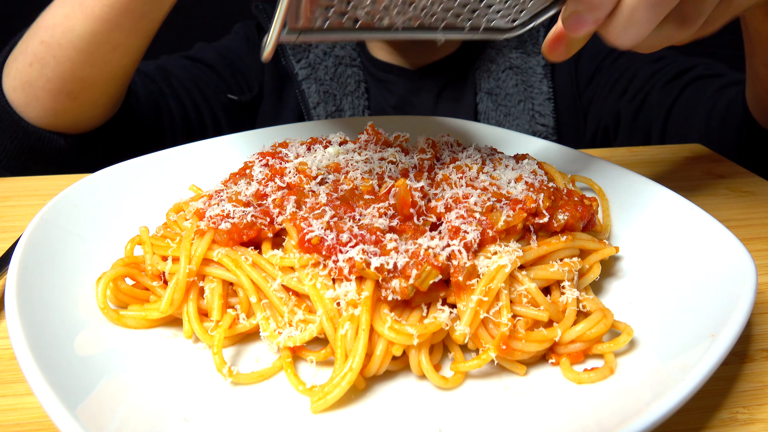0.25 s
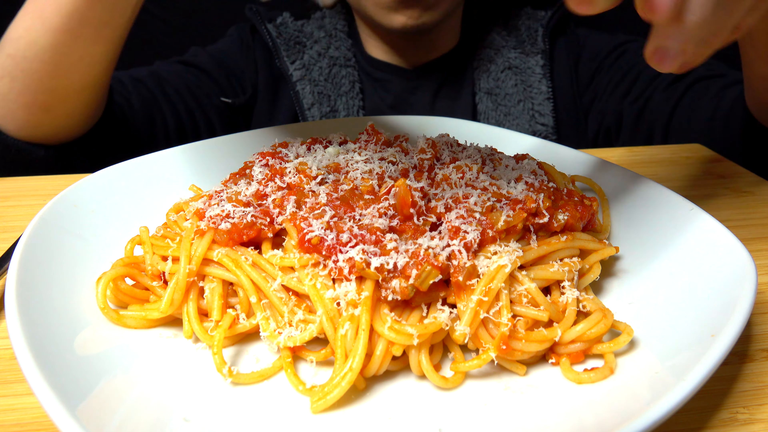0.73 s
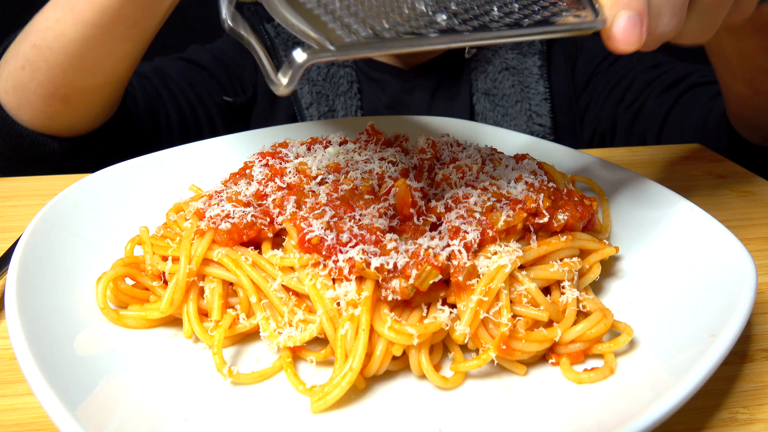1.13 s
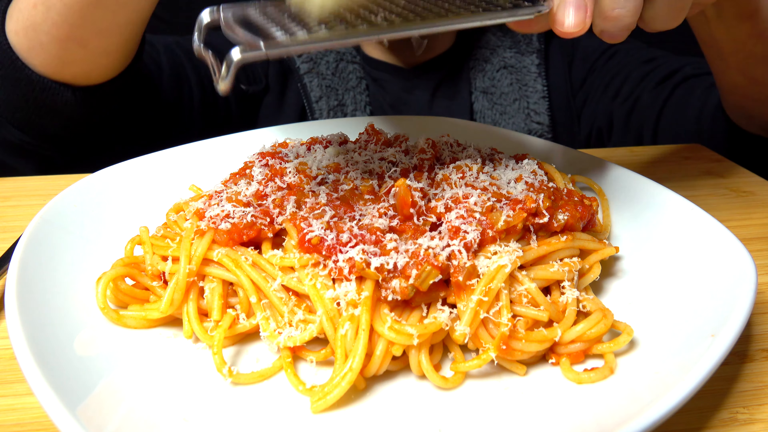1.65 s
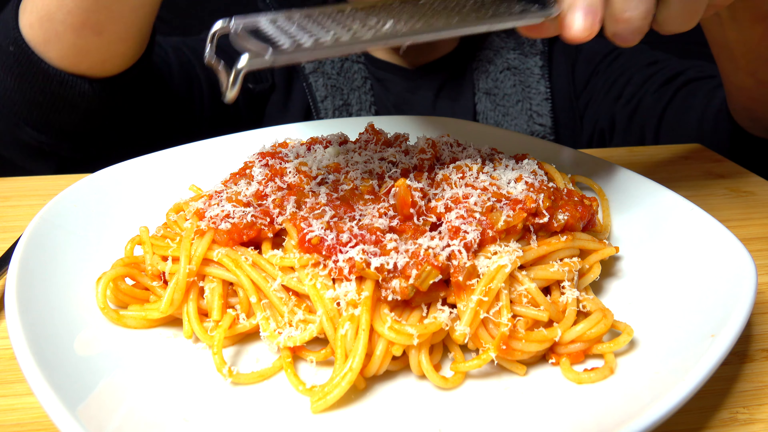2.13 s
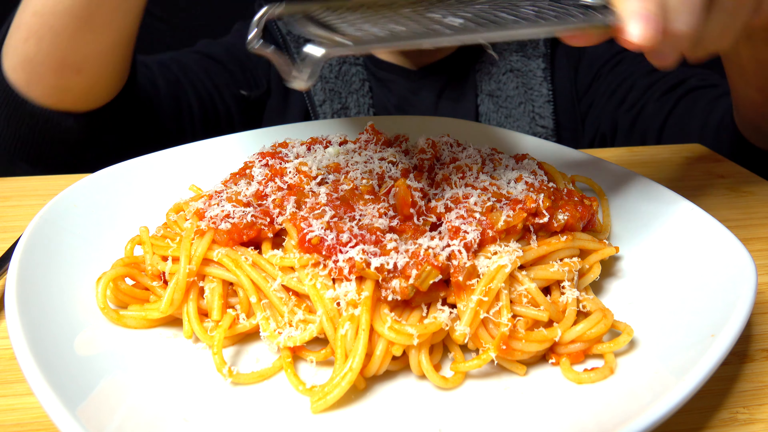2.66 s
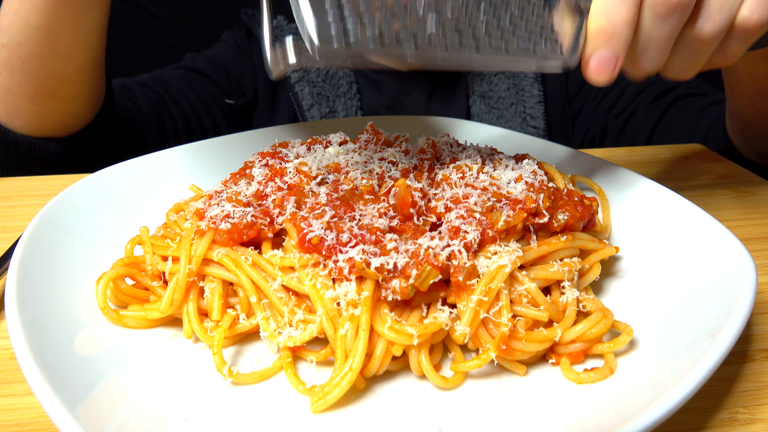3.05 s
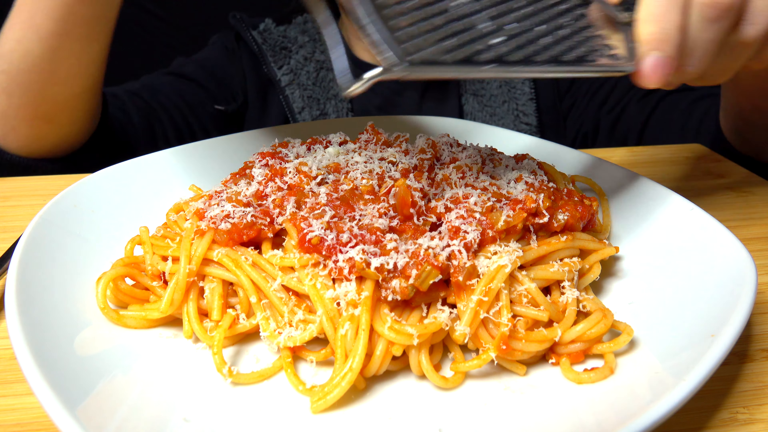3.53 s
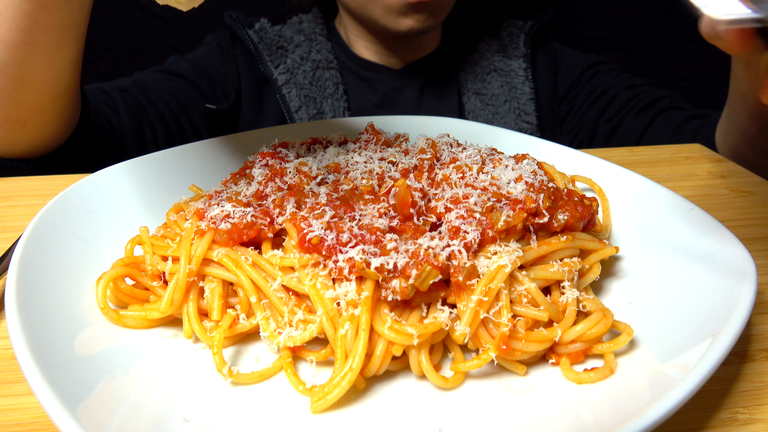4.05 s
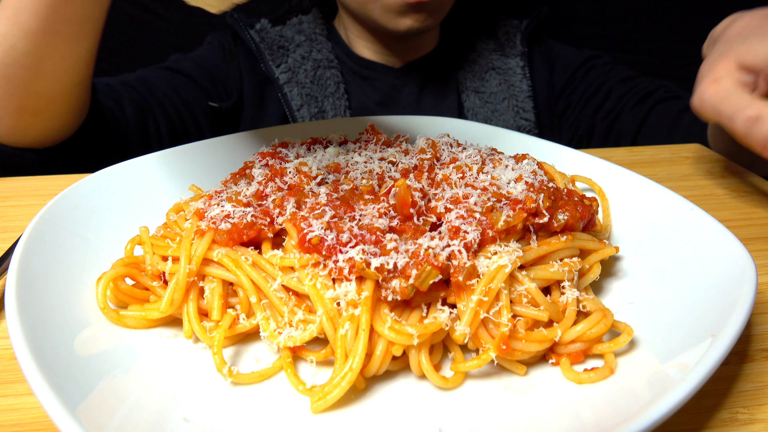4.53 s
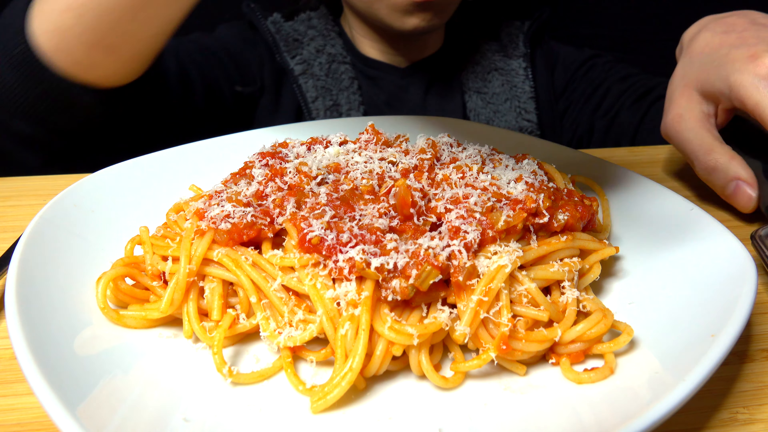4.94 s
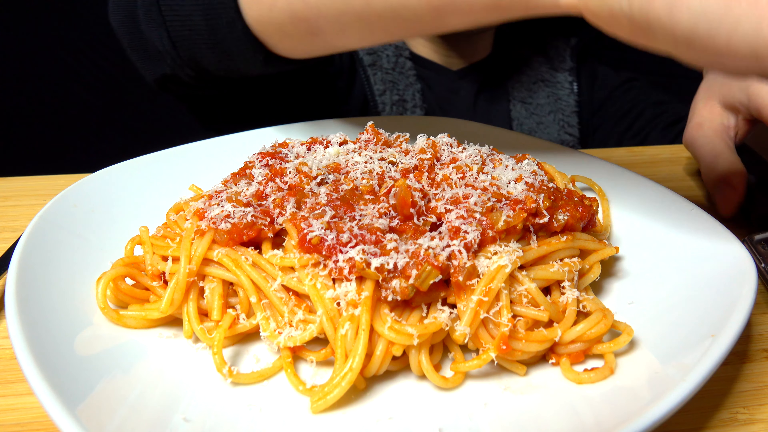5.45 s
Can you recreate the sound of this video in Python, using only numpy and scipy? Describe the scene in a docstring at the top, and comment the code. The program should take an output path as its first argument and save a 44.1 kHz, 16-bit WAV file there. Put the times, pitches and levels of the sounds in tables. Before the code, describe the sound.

Faint dry rasping and small metallic clicks in a rumbling room, sleeves rustling, then the grater cracks down and a second knock rattles tableware.

```python
"""Hard cheese is rubbed softly over a hand-held steel grater: crumb clicks blurred by the room into a rasp.
Light taps among the strokes and after them click and ring the grater; sleeves rustle as the arms move.
Then the grater is put down on the wooden table: cracks, ringing metal and a boomy echo.
Last, a second knock jolts the table and rings the tableware. Both knocks overload the close stereo pickup.
Under it all lie room rumble, hiss and a thin electrical whine, made from shaped noise and a wavering tone."""
import sys
import numpy as np
from scipy import signal
from scipy.fft import rfft, irfft
from scipy.io import wavfile
from scipy.ndimage import uniform_filter1d

SR = 44100
rng = np.random.default_rng(int(sys.argv[2]) if len(sys.argv) > 2 else 0)


def int16_out(signal):
    """Quantize to a 16-bit WAV file."""
    q = np.round(np.clip(np.atleast_2d(signal).T, -1, 1) * 32767)
    wavfile.write(sys.argv[1], SR, q.astype(np.int16))


N = 250929  # length in samples

# Background noise spectrum: pitch_hz, relative level_db (per Hz)
FLOOR_COLOUR = [(15, -28), (28, -20), (60, -10), (110, -4.5), (150, -2), (340, -17.5), (600, -21.5),
                (1000, -19.5), (1300, -22), (2070, -27.5), (6000, -33.5), (15600, -34.5)]
# Likeness of the background noise at left and right: pitch_hz, likeness (-1 to 1)
FLOOR_LIKENESS = [(60, 0.92), (130, 1), (290, 0.53), (640, 0.16), (1400, -0.16), (3100, 0.36), (7000, 0.26),
                  (15000, 0.55)]
FLOOR_DB = -45
WHINE_HZ, WHINE_DB = 13950, -72.5

# How long room echoes last: pitch_hz, fall_by_60_db_s
ROOM_T60 = [(100, 0.9), (260, 0.26), (700, 0.48), (1840, 0.59), (4850, 0.57), (8000, 0.5), (14000, 0.35)]
# Likeness of nearby noise and echoes at left and right: pitch_hz, likeness (-1 to 1)
ROOM_LIKENESS = [(60, 0.97), (130, 1), (290, 0.83), (640, 0.67), (1410, 0.58), (3100, 0.46), (6800, 0.43),
                 (15000, 0.5)]
# Extra level at the left microphone: pitch_hz, left_minus_right_db
LEFT_LEAN = [(200, 1), (700, .5), (2400, 2), (8000, 3)]
# Low notes of the room: pitch_hz, relative level_db, fall_by_60_db_s
ROOM_MODES = [(74.2, -12, 0.21), (122.7, -12.5, 1), (187.9, -0.5, 0.69), (245, -13.5, 0.47),
              (314, -4.5, 0.44)]
# Dull bumps that start those notes: start_s, relative level_db, centre_hz
BUMPS = [(1.487, -24, 75), (2.02, -22.5, 122), (3.389, -27, 189), (3.451, -22.5, 186), (3.63, -36.5, 320),
         (3.665, -24, 74.6), (4.552, -35, 170)]
BUMP_FALL_DB = 25.5  # loss per octave away from a bump's centre
KNOCK_BOOM_DB = -0.74  # push on every low note, relative to the knock's greatest room_db

# Arm movements: middle_s, length_s, relative rustle_db, relative brushing_db
MOVES = [(0.02, 0.19, -51.5, -64), (1.075, 0.45, -43, -80), (2.086, 0.42, -47, -68),
         (2.5, 0.44, -52.5, -73), (3.232, 0.14, -45, -54), (3.517, 0.35, -38, -50.5),
         (4.102, 0.26, -45.5, -54.5), (4.615, 0.12, -41.5, -77), (4.98, 0.35, -37.5, -52),
         (5.46, .3, -39.5, -57)]
# Dull sleeve rustle: pitch_hz, relative level_db (per Hz)
RUSTLE_COLOUR = [(60, -41.5), (130, -6.5), (190, 9), (300, -0.5), (450, -10.5), (900, -21.5), (1500, -37),
                 (4000, -41), (12000, -49)]
# Cloth sliding on cloth: pitch_hz, relative level_db
BRUSH_COLOUR = [(150, -27), (500, -1.5), (950, -5), (1500, -20), (4000, -22), (12000, -45)]
# Low rumble heard once the grater is lifted: pitch_hz, relative level_db (per Hz)
RUMBLE_COLOUR = [(15, -10), (40, 1), (65, -3.5), (100, -12.5), (125, 4.5), (170, -5), (300, -20),
                 (1500, -86)]
LIFT_S, LIFT_RISE_S = 0.73, 0.25  # start and length of the rumble's fade-in
RUMBLE_DB, RUMBLE_FOLLOW_DB = -48.7, -4.5  # steady part, and share of each arm movement
SWELL_EDGE_DB = -5.5  # change half a length away from the middle of a movement or stroke

# Strokes of the cheese over the teeth: middle_s, length_s, relative level_db
STROKES = [(0.02, 0.13, -54), (0.5, 0.19, -81), (1.1, 1, -57.5), (1.78, 0.23, -51.5), (2.45, 1, -53.5)]
# Spectrum of the rasp: pitch_hz, relative level_db (per Hz)
RUB_COLOUR = [(300, -30), (700, -16), (950, 6.5), (1700, -7), (2600, 0.5), (3600, -6.5), (7000, -18),
              (15000, -18)]

# Light taps: start_s, relative click_db, relative ring_db, thud_db (low end against the rest),
# brightness_db_per_octave, spot (0 = rim, 1 = sheet)
TAPS = [(0.061, -38, -57, -6, 8.5, .5), (0.143, -36, -53.5, -16, 6.5, 0.42),
        (0.276, -39, -62, -6, 10.5, 0.37), (1.2098, -19.5, -44, 15.5, -1, 0.36),
        (1.489, -22, -37.5, -7, -1, 0), (1.561, -33, -36, -20, 3, 0.73), (1.660, -28, -42.5, -11, -1, 0.08),
        (1.858, -30, -57, -9, -5, 0.27), (2.090, -14.5, -40, -2.5, 2.2, 0.15),
        (2.3136, -26, -31.5, -17, 1.5, 0.16), (2.523, -17.5, -38.5, -24, 0.2, 0.097),
        (3.4629, -16, -40.5, 10, -2.5, 0.24)]
# Notes of the grater before the hand damps it:
# pitch_hz, relative rim_db, relative sheet_db, undamped fall_by_60_db_s
HELD_MODES = [(877, 2.5, -20, 0.32), (940, 0, -1.5, 0.41), (1070, -3, -6.5, 0.49), (1370, -8.5, 4, 0.54),
              (1490, -7, -21, 0.47), (2020, 1.5, -41, 0.33), (2090, -17, 8.5, 0.3), (2496, -6, 12, 0.32),
              (2620, -4, -4, 0.2), (2730, -0.5, -25, 0.3), (3280, 0.5, -15, .25), (4230, -5.5, 0, 0.33),
              (4590, -5, 6.5, 0.24), (5890, -6, 7, 0.25), (7030, -7, 12, 0.11)]
# Low end of a tap before its thud setting: pitch_hz, relative level_db
TAP_LOW_END = [(60, -8), (400, 15)]
# Upper part of a tap before its brightness setting: pitch_hz, relative level_db
TAP_UPPER_PART = [(950, 6), (2600, -0.5), (10000, -12.5)]
TAP_PIVOT_HZ = 2600  # brightness tilts the upper part around this pitch
GRIP_DAMPING = 0.75  # share of ring time left by the hand

# Contacts as the grater is put down: start_s, relative crack_db, relative room_db
SET_DOWN_CONTACTS = [(4.7897, -1, -16), (4.8056, 0, -12), (4.8157, -7, -17), (4.8325, -20, -17.5),
                     (4.8505, -9, -20.5), (4.8980, -22, -23.5)]
# Contacts of the knock that jolts the table: start_s, relative crack_db, relative room_db
JOLT_CONTACTS = [(5.2605, -8, -25), (5.2706, 1, -8), (5.2890, -10, -10), (5.3050, -12, -12.5),
                 (5.3200, -11, -11), (5.3440, -25, -16.5)]
# Notes of the grater on the table: pitch_hz, relative level_db
GRATER_MODES = [(1063, -6.5), (1279, -6), (1324, -7), (1353, -0.5), (1385, -26), (1417, -6), (1467, -4),
                (1499, -13), (1856, -4), (1888, -6), (1935, -17), (2089, -11), (2110, -6), (2144, -20),
                (2736, -7), (2820, 0.5), (2871, -3.5), (2945, -11), (2997, -5), (3020, -2), (3047, -6),
                (3074, -11), (3157, -6), (3226, -7), (3256, -9), (3692, -6), (4173, -4.5), (4400, -4.5),
                (4542, -25), (5105, -14)]
# Notes of the tableware: pitch_hz, relative level_db
TABLEWARE_MODES = [(579, -4), (630, -3.5), (719, -14), (777, -17), (801, -21), (875, -24.5), (935, -11),
                   (984, -18), (1102, 1.5), (1133, -0.5), (1244, -14), (1299, -0.5), (1322, -5), (1347, -3),
                   (1370, -21), (1417, -9), (1999, 1.5), (2118, -1), (2144, -2.5), (2295, 0.5), (2365, -10),
                   (2678, -2), (2764, 1), (3000, -2), (3025, -1), (3056, 0), (3273, -9), (3417, -15),
                   (3464, -8.6), (4056, -2)]
# Crack noise of both knocks: pitch_hz, relative level_db (per Hz)
CRACK_COLOUR = [(100, -6.5), (300, 1.5), (700, -15), (1300, -5.5), (2000, -6), (2500, -6), (3200, -3.5),
                (4500, -8), (7000, -27.5), (11000, -44), (16000, -42)]
# Room sound of the first knock: pitch_hz, relative level_db (per Hz)
SET_DOWN_COLOUR = [(100, -20), (300, -2.5), (480, -10.5), (900, -9.5), (1420, 3), (1680, -6), (2050, 2.5),
                   (2550, -5.5), (3000, 3.5), (3700, -8.5), (4300, -5.5), (4900, -10.5), (6000, -13),
                   (8000, -24), (12500, -28), (16000, -45)]
# Room sound of the second knock: pitch_hz, relative level_db (per Hz)
JOLT_COLOUR = [(70, -12), (280, 5.5), (480, -11), (650, -1.5), (1350, 2), (1620, -3.5), (2050, 1),
               (3000, -0.5), (3700, -6.5), (5000, -13), (6400, -19.5), (8000, -32), (12000, -39.5),
               (16000, -54)]
# Short notes of the table top: pitch_hz, relative level_db, fall_by_60_db_s
TABLE_TOP_MODES = [(1420, -9.5, 0.022), (1857, -2, 0.03), (2093, 0, 0.03), (3140, -4, 0.034)]

EDGE_HZ = 15800  # upper band limit


def amp(db):
    """Turns decibels into a gain."""
    return 10 ** (np.asarray(db) / 20)


def unit(x):
    """Scales a signal to an average strength (rms) of 1."""
    return x / np.sqrt(np.mean(x ** 2) + 1e-20)


def read(points, hz):
    """Reads between table points, with pitch spaced by ratio (a log axis)."""
    table_hz, value = np.transpose(points)
    return np.interp(np.log(hz + 1), np.log(table_hz + 1), value)


def add(mix, start_s, sound):
    """Mixes in a sound from its start time, cutting it at the end of the mix."""
    part = mix[:, round(start_s * SR):][:, :sound.shape[1]]
    part += sound[:, :part.shape[1]]


def tint(x, colour):
    """Shapes a signal's spectrum, then scales it to rms 1."""
    size = x.shape[-1]
    gain = amp(read(colour, np.fft.rfftfreq(size, 1 / SR)))
    return unit(irfft(rfft(x) * gain, size))


def early_pulse(colour, size=4096):
    """Makes a pulse with a given spectrum and its energy as early as possible (minimum phase)."""
    hz = abs(np.fft.fftfreq(size, 1 / SR))
    log_gain = np.log(amp(read(colour, hz)))
    spectrum = np.exp(np.conj(signal.hilbert(log_gain)))
    return np.fft.ifft(spectrum).real[None]


def stereo_noise(size, likeness):
    """Makes white noise whose left-right likeness depends on pitch."""
    left, other = rfft(rng.standard_normal((2, size)))
    same = np.clip(read(likeness, np.fft.rfftfreq(size, 1 / SR)), -1, 1)
    right = same * left + np.sqrt(1 - same ** 2) * other
    return irfft(np.array([left, right]), size)


def wander(size, order):
    """Smooths random values over `order` steps and scales them to rms 1."""
    return unit(uniform_filter1d(rng.standard_normal(size), order))


def swells(rows):
    """Makes bell-shaped swells as a gain; overlapping ones add in power."""
    t = np.arange(N) / SR
    power = 0
    for middle_s, length_s, db in rows:
        from_middle = 2 * (t - middle_s) / length_s
        power = power + amp(db + SWELL_EDGE_DB * from_middle ** 2) ** 2
    return np.sqrt(power)


def room_tail(x, build_s):
    """Makes one second of echoes that build up while each pitch dies at its own speed."""
    hz, t, bands = signal.stft(x, SR, nperseg=256, noverlap=192)
    fade = amp(-60 * t / read(ROOM_T60, hz)[:, None])
    tail = signal.istft(bands * fade, SR, nperseg=256, noverlap=192)[1]
    build_up = 1 - np.exp(-np.arange(SR) / SR / build_s)
    return tail[:, :SR] * build_up


def ring(modes, spread):
    """Makes one second of dying notes, each shifted in phase between left and right."""
    t = np.arange(SR) / SR
    start_phases = rng.uniform(0, 2 * np.pi, (len(modes), 1))
    side_shifts = spread * rng.choice([-1, 1], (len(modes), 1)) * [1, -1]  # radians
    out = np.zeros((2, SR))
    for (hz, db, t60), phase in zip(modes, start_phases + side_shifts):
        decay = np.exp(-np.log(1000) * t / t60)  # falls by 60 dB in t60 seconds
        out += amp(db) * decay * np.sin(2 * np.pi * hz * t + phase[:, None])
    return out


def main_contact(contacts):
    """Picks the contact of a knock that fills the room most."""
    return max(contacts, key=lambda row: row[2])


def floor(waver_hz=60):
    """Room rumble and microphone hiss are shaped noise; an electrical whine wavers in pitch."""
    hz = WHINE_HZ + waver_hz * wander(N, order=150)
    whine = amp(WHINE_DB) * unit(np.sin(2 * np.pi * np.cumsum(hz) / SR))
    noise = amp(FLOOR_DB) * tint(stereo_noise(N, FLOOR_LIKENESS), FLOOR_COLOUR)
    return noise + whine


def boom(rise_s=0.005):
    """Bumps and knocks set the room's low notes swelling and dying, equally on both sides."""
    out, t = np.zeros((2, N)), np.arange(SR) / SR
    knocks = [main_contact(SET_DOWN_CONTACTS), main_contact(JOLT_CONTACTS)]
    for hz, mode_db, t60 in ROOM_MODES:
        swell = (1 - np.exp(-t / rise_s)) * np.exp(-np.log(1000) * t / t60)
        pushes = [(s, db - BUMP_FALL_DB * abs(np.log2(hz / centre_hz))) for s, db, centre_hz in BUMPS]
        pushes += [(s, room_db + KNOCK_BOOM_DB) for s, _, room_db in knocks]
        for s, db in pushes:
            tone = np.sin(2 * np.pi * hz * (t + s))[None]
            add(out, s, amp(db + mode_db) * swell * tone)
    return out


def handling(rest_db=-60):
    """Sleeves rustle and brush as the arms move; a low rumble joins in after the lift."""
    motion = swells([(s, length, db) for s, length, db, _ in MOVES])
    brush_gain = swells([(s, length, db) for s, length, _, db in MOVES])
    brushing = brush_gain * tint(stereo_noise(N, ROOM_LIKENESS), BRUSH_COLOUR)
    rustle_gain = np.hypot(motion, amp(rest_db))  # a faint rustle remains at rest
    rustle = rustle_gain * tint(stereo_noise(N, ROOM_LIKENESS), RUSTLE_COLOUR)
    lifted = np.clip((np.arange(N) / SR - LIFT_S) / LIFT_RISE_S, 0, 1)
    rumble_gain = lifted * np.hypot(amp(RUMBLE_DB), amp(RUMBLE_FOLLOW_DB) * motion)
    rumble = rumble_gain * tint(stereo_noise(N, ROOM_LIKENESS), RUMBLE_COLOUR)
    return rustle + brushing + rumble


def rubbing(bites_per_s=1500, size_db=2.5):
    """The teeth bite off tiny crumbs, each a click; the room smears them to a fine rasp."""
    happens = rng.random(N) < bites_per_s / SR
    direction = rng.choice([-1, 1], N)
    size = amp(size_db * np.minimum(rng.exponential(1, N), 5))
    direct = tint(happens * direction * size, RUB_COLOUR)
    echoes = room_tail(stereo_noise(SR, ROOM_LIKENESS), build_s=0.0047)
    wet = unit(signal.fftconvolve(direct[None], echoes, axes=1)[:, :N])
    return swells(STROKES) * unit(direct + wet)


def taps(click_db=-4, ring_db=-9, room_db=-7, chatter_db=5, chatter_s=0.0069):
    """A tap clicks, chatters briefly and rings the grater and room, coloured by where it lands."""
    out, t = np.zeros((2, N)), np.arange(SR) / SR
    for s, peak_db, level_db, thud_db, bright_db, spot in TAPS:
        low = [(hz, db + thud_db) for hz, db in TAP_LOW_END]
        upper = [(hz, db + bright_db * np.log2(hz / TAP_PIVOT_HZ)) for hz, db in TAP_UPPER_PART]
        pulse = amp(level_db) * early_pulse(low + upper)
        modes = [(hz, np.interp(spot, [0, 1], [rim_db, sheet_db]), GRIP_DAMPING * t60)
                 for hz, rim_db, sheet_db, t60 in HELD_MODES]
        chatter_fade = np.exp(-(t / chatter_s) ** 2)
        chatter = amp(chatter_db) * stereo_noise(SR, ROOM_LIKENESS) * chatter_fade
        ringing = amp(ring_db) * ring(modes, spread=0.42)
        echoes = amp(room_db) * room_tail(stereo_noise(SR, ROOM_LIKENESS), build_s=0.0072)
        add(out, s, amp(peak_db + click_db) * pulse / abs(pulse).max())
        add(out, s, signal.fftconvolve(chatter + ringing + echoes, pulse, axes=1))
    return out


def knock(contacts, colour, modes, ring_db, ring_t60, crack_s, clack_db, ragged_db, rattle_db, build_s,
          grit_db=-3):
    """Each contact cracks on the table top and fills the room; the main one rings the strong notes."""
    out, t, hz = np.zeros((2, N)), np.arange(SR) / SR, np.fft.rfftfreq(SR, 1 / SR)
    # countless weaker notes make the treble uneven, in the same way for every bounce
    ragged = amp(ragged_db * wander(len(hz), order=70) * np.minimum(hz / 6000, 1))
    for s, crack_db, room_db in contacts:
        grit = amp(grit_db) * tint(stereo_noise(SR, ROOM_LIKENESS), CRACK_COLOUR) * np.exp(-t / crack_s)
        clack = amp(clack_db) * ring(TABLE_TOP_MODES, spread=0.44)
        uneven_noise = irfft(rfft(stereo_noise(SR, ROOM_LIKENESS)) * ragged, SR)
        echoes = room_tail(tint(uneven_noise, colour), build_s)
        rattle = unit(amp(rattle_db * wander(SR, order=130)))  # loose parts chatter as the knock dies
        add(out, s, amp(crack_db) * (grit + clack) + amp(room_db) * echoes * rattle)
    ringing = ring([(mode_hz, db, ring_t60) for mode_hz, db in modes], spread=0.29)
    add(out, main_contact(contacts)[0], amp(ring_db) * ringing)
    return out


def set_down():
    """The grater lands on the wooden table, bounces and rings."""
    return knock(SET_DOWN_CONTACTS, SET_DOWN_COLOUR, GRATER_MODES, ring_db=-17.5, ring_t60=0.5,
                 crack_s=0.0035, clack_db=-2.5, ragged_db=3.0, rattle_db=1.0, build_s=0.0025)


def jolt():
    """A second knock jolts the table, and the tableware rattles and rings."""
    return knock(JOLT_CONTACTS, JOLT_COLOUR, TABLEWARE_MODES, ring_db=-19.5, ring_t60=0.52,
                 crack_s=0.0091, clack_db=-2.5, ragged_db=2.0, rattle_db=1.5, build_s=0.0094)


def scene():
    """Mixes all sounds at the table, a little louder on the left, over the background noise."""
    near = boom() + handling() + rubbing() + taps() + set_down() + jolt()
    lean_db = read(LEFT_LEAN, np.fft.rfftfreq(2 * N, 1 / SR))
    side_gains = amp(np.outer([.5, -.5], lean_db))  # half the difference up on the left, half down on the right
    return irfft(rfft(near, 2 * N) * side_gains)[:, :N] + floor()


def record(dry):
    """The converter clips at full scale; then a low-pass filter limits the treble."""
    clipped = np.clip(dry, -1, 1)
    low_pass = signal.firwin(511, EDGE_HZ, window=("kaiser", 9), fs=SR)
    return signal.oaconvolve(clipped, low_pass[None], "same")


dry = scene()
out = record(dry)
int16_out(out)
```